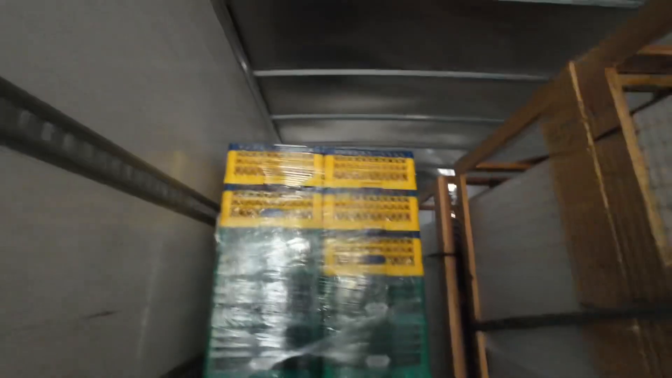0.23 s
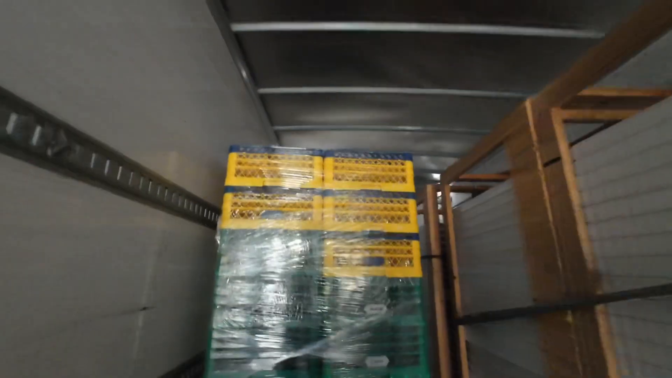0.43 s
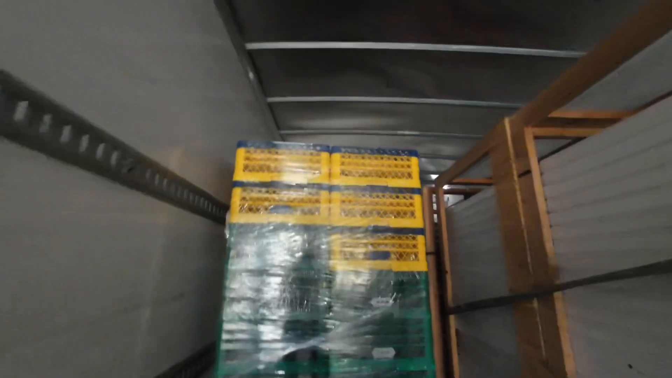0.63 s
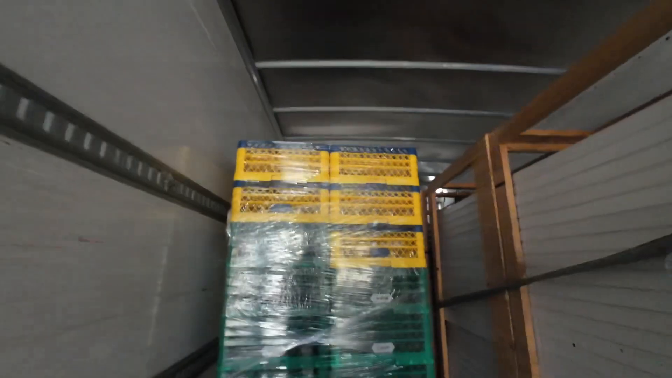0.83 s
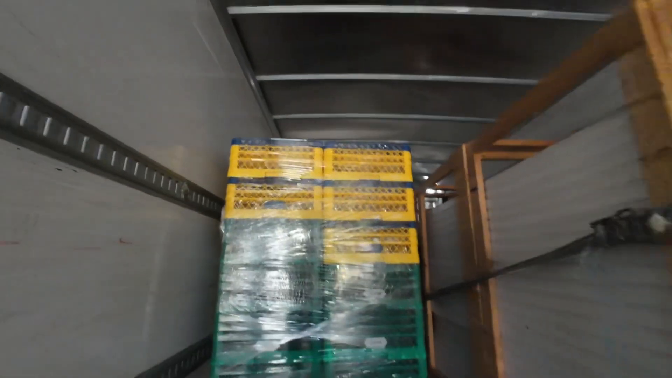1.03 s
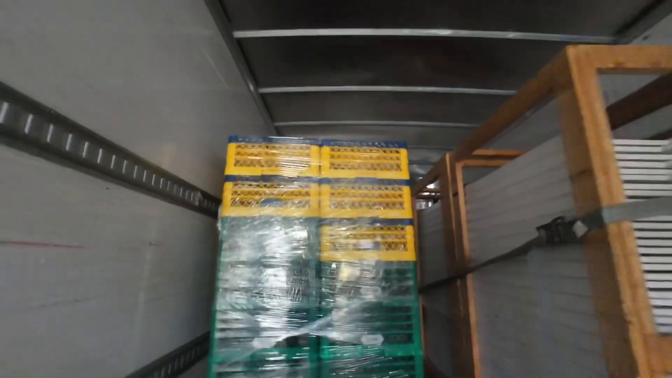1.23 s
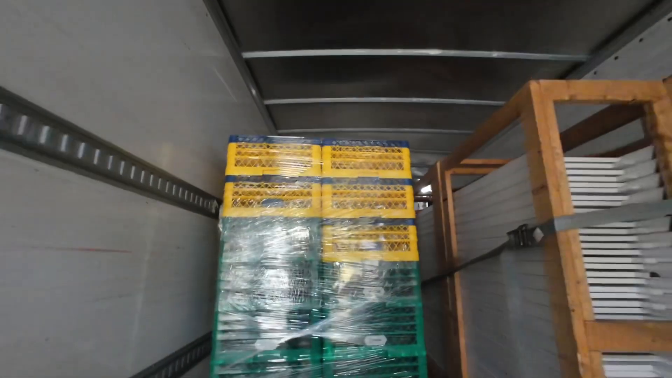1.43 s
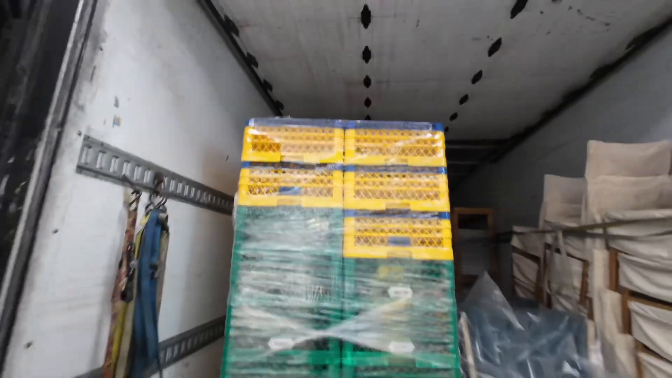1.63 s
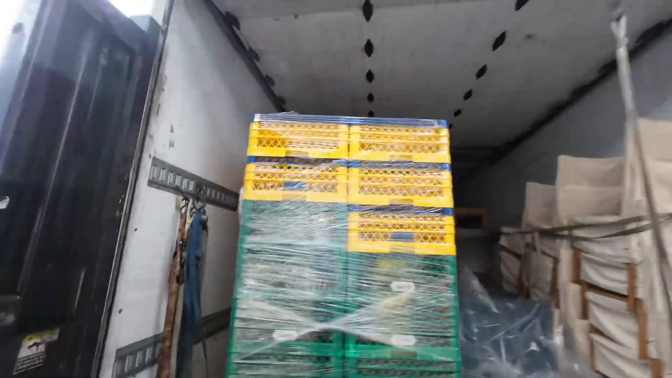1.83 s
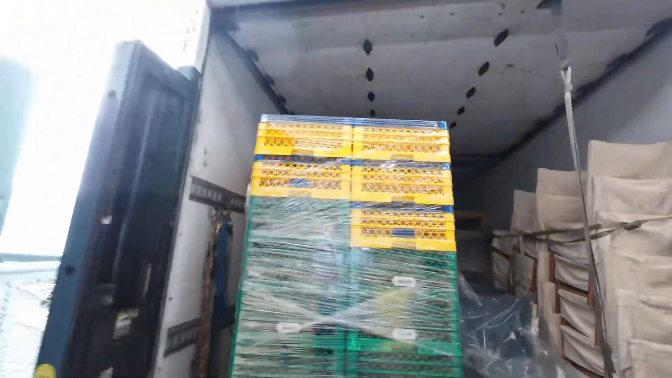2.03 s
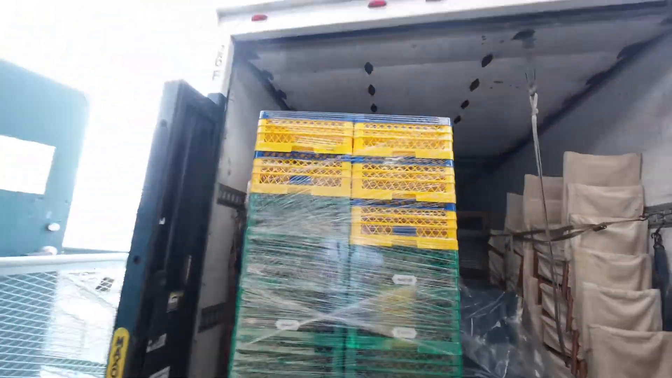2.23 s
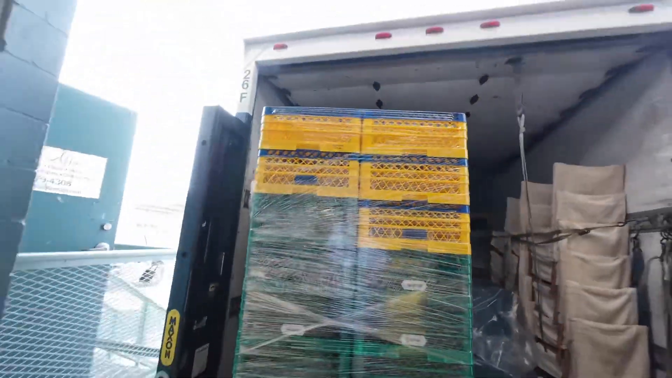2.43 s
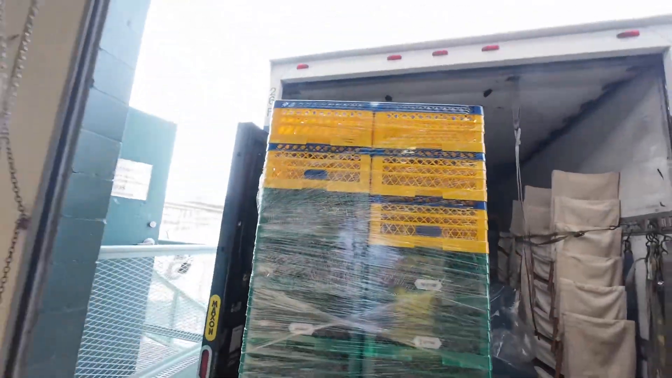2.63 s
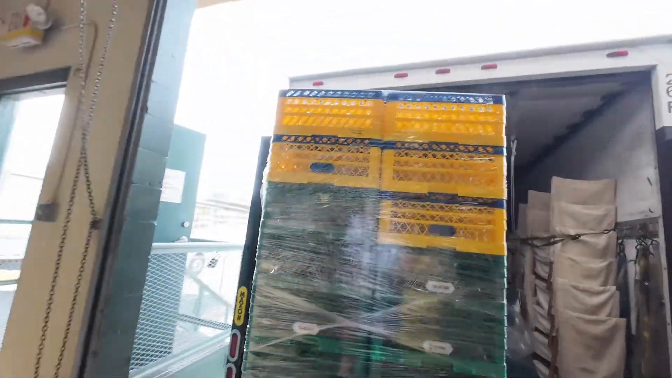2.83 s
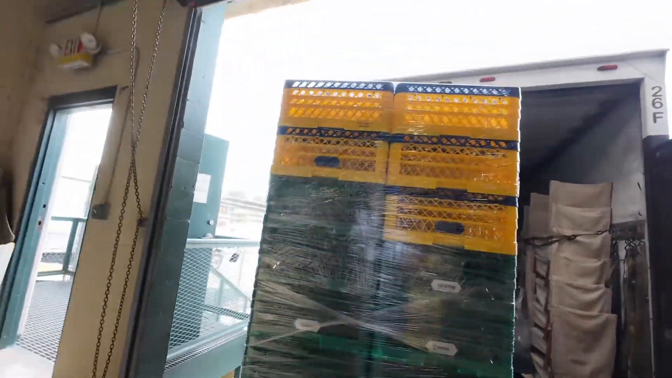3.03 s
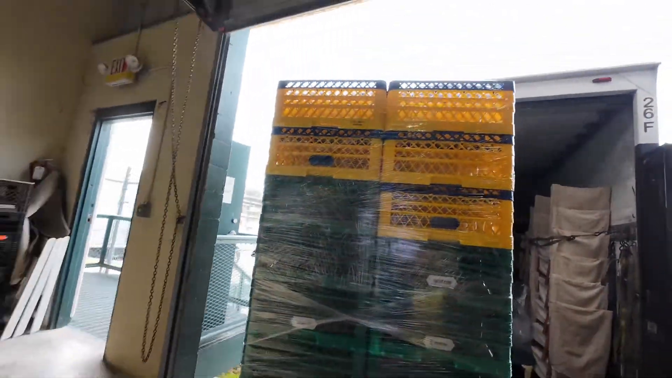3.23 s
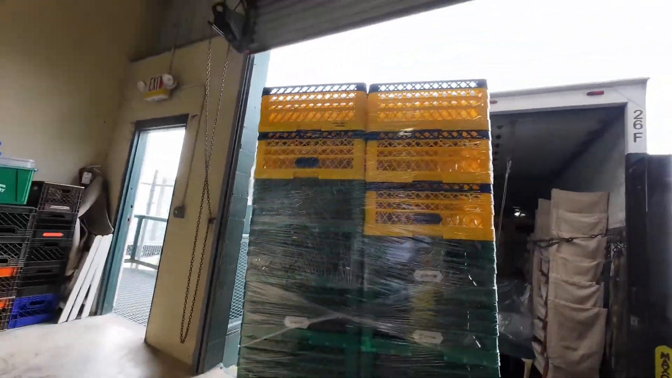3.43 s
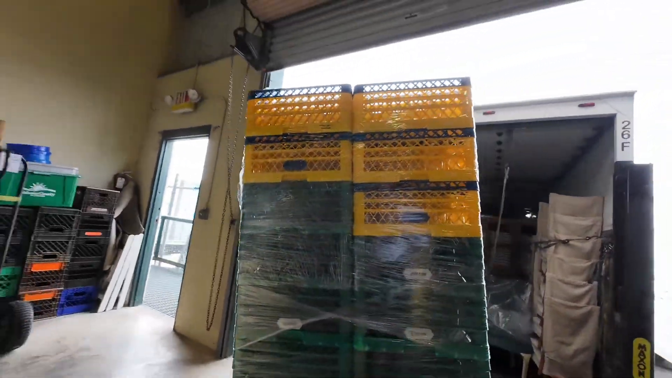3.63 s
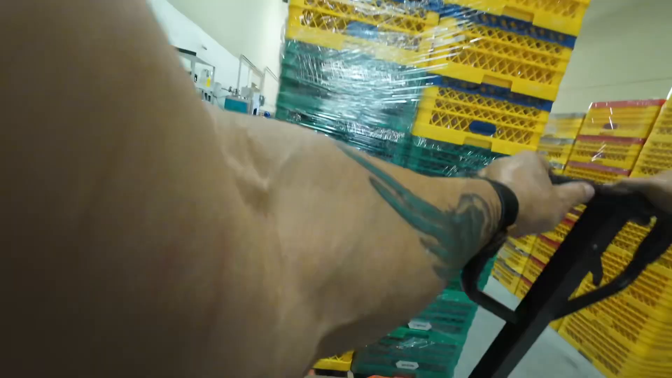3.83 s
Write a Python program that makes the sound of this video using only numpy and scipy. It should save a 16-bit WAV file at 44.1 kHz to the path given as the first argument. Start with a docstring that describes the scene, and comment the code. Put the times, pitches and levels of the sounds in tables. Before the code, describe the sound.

A hand pallet jack hauling wrapped crates starts from near silence, clanks and rattles in a truck, eases briefly, then booms and bangs across the dock plate indoors; close microphone, reverberant hard space.

```python
"""Loading dock: a hand pallet jack hauls wrapped plastic crates out of a truck, over a steel plate, indoors.
Random wheel contacts drive filters: the floor booms and drums, the pallet chatters, grit crunches.
Short contact flurries make clanks, knocks, thumps, scrapes and snaps, each with a diffuse noise tail.
Fine hiss is filtered contacts; small steel parts and one squeaking wheel are wavering sines."""
import sys
import numpy as np
from scipy import signal
from scipy.fft import rfft, irfft, next_fast_len
from scipy.io import wavfile
from scipy.ndimage import map_coordinates

SR = 44100
rng = np.random.default_rng(int(sys.argv[2]) if len(sys.argv) > 2 else 0)


def unload_wav(signal):
    """Save mono or channel-first audio to the path in sys.argv[1] as 16-bit WAV at rate SR, clipped to [-1, 1]."""
    wavfile.write(
        sys.argv[1],
        SR,
        np.round(np.clip(np.atleast_2d(signal).T, -1, 1) * 32767).astype(np.int16),
    )


N = 171990
T = np.arange(SR) / SR  # one second, for single events
CLOCK = np.arange(N) / SR

# spectra of the hollow floor, the pallet and finely hissing surfaces: f/Hz, relative level/dB
FLOOR_COLOUR = [(50, -30.5), (95, -8), (125, -0.5), (158, -3.5), (197, 1.5), (240, -1.5), (310, -2),
                (420, -8), (900, -41), (3000, -95)]
WOOD_COLOUR = [(120, -32), (280, -8), (400, 2), (520, 1.5), (680, -2.5), (900, -8.5), (1300, -16),
               (2500, -41), (8000, -68)]
HISS_COLOUR = [(2500, -22), (5500, -3.5), (7800, -1), (9000, -1), (9700, 0), (10600, -0.5), (11800, -2.5),
               (13500, 5.5), (15000, -6.5), (16000, -17.5)]


def amp(db):
    """Decibels to gain."""
    return 10 ** (np.asarray(db) / 20)


def unit(x):
    """Scale to rms 1."""
    return x / np.sqrt(np.mean(x ** 2) + 1e-20)


def along(points, hz):
    """Interpolate (f/Hz, value) points on a log frequency axis."""
    f, v = np.transpose(points)
    return np.interp(np.log(hz + 1), np.log(f + 1), v)


def curve(rows):
    """Interpolate a (t/s, value) table to one value per sample."""
    return np.interp(CLOCK, *np.transpose(rows))


def wobble(rate, size=N):
    """Smooth random curve with `rate` knots a second."""
    knots = rng.standard_normal(4096)
    return map_coordinates(knots, [np.arange(size) * rate / SR], mode="wrap")


def fade(t60):
    """Exponential decay of 60 dB in t60 seconds."""
    return np.exp(-np.log(1000) * T / max(t60, 1e-3))


def body(colour, focus_hz=1000, focus_db=0, size=16384):
    """Minimum-phase impulse response of energy 1 with this colour and one resonance lifted."""
    hz = np.fft.rfftfreq(size, 1 / SR)
    lift = focus_db / (1 + (np.log((hz + 1) / focus_hz) / .11) ** 2)
    cepstrum = irfft(np.log(amp(along(colour, hz) + lift)))
    # fold the cepstrum to make the response causal
    cepstrum[1:size // 2] *= 2
    cepstrum[size // 2 + 1:] = 0
    h = irfft(np.exp(rfft(cepstrum)))
    return h / np.linalg.norm(h)


def contacts(rate, spread_db, size):
    """Random tiny impacts, `rate` a second on average, of uneven size; rms 1."""
    hits = rng.random(size) < rate / SR
    force = rng.standard_normal(size)
    spread = amp(spread_db * np.clip(rng.standard_normal(size), -2, 2))
    return unit(hits * force * spread)


def room(x, wet_db):
    """Add a fresh diffuse noise tail; each frequency dies at its own speed."""
    # reverberation: f/Hz, t60/s
    decay = [(100, 0.25), (500, 1.2), (1500, 0.86), (4000, 0.82), (9000, 0.61), (15000, 0.63)]
    hz, t, z = signal.stft(rng.standard_normal(SR), SR, nperseg=256)
    z = z * np.exp(-np.log(1000) * t / along(decay, hz)[:, None])
    tail = signal.istft(z, SR, nperseg=256)[1][:SR]
    tail = tail * (1 - np.exp(-T / 0.004))  # gradual onset
    wet = signal.fftconvolve(x, tail / np.linalg.norm(tail))[:len(x)]
    return x + amp(wet_db) * wet


def blow(response, length, rate, rise, clump_db=0):
    """A swelling, then dying flurry of contacts strikes a body; rms 1 over the first 20 ms."""
    envelope = fade(length) * (1 - np.exp(-T / rise))
    force = contacts(rate, 0.59, SR) * envelope * amp(clump_db * wobble(109, size=SR))
    x = signal.fftconvolve(force, response)[:SR]
    return x / np.sqrt(np.mean(x[:SR // 50] ** 2) + 1e-20)


def add(out, s, x):
    """Mix an event in at time s; its ringing stops short at the next break."""
    # instants where the ringing of earlier events is cut: t/s
    breaks_s = [.182, 1.531]
    start = round(s * SR)
    end = min([N, start + len(x)] + [round(b * SR) for b in breaks_s if b > s])
    out[start:end] += x[:end - start]


def rolling(colour, rate, spread_db):
    """Surface roughness shakes a body without pause; rms 1."""
    return unit(signal.fftconvolve(contacts(rate, spread_db, N), body(colour))[:N])


def wheels():
    """Wheels make the floor flex, boom and drum, bounce the pallet on the forks and crush grit."""
    # slow flexing of the truck bed: t/s, level/dB
    sub_db = [(0, -34), (.28, -38), (.37, -19.5), (.68, -21), (.79, -30.5), (1.48, -33), (1.54, -17),
              (1.78, -21), (1.88, -17), (2.15, -25), (2.3, -30), (2.6, -32), (3.05, -30), (3.45, -35),
              (3.65, -44), (3.9, -44)]
    # hollow floor, drumming, pallet chatter, grit: t/s, level/dB before trim
    boom_db = [(0, -48), (.18, -49), (.22, -31.5), (.32, -31), (.4, -21.5), (.62, -23), (.78, -29.5),
               (1.4, -31), (1.5, -26), (1.54, -17.5), (1.75, -20), (1.88, -16), (2.1, -18.5), (2.3, -29),
               (2.45, -17.5), (2.65, -27), (3.05, -22.5), (3.45, -31), (3.7, -47), (3.9, -54)]
    drum_db = [(0.0, -56), (0.25, -23), (0.65, -22), (0.79, -26), (1.66, -19.5), (1.67, -18), (1.8, -21),
               (1.83, -18), (2.06, -19), (2.54, -16.5), (2.68, -21.5), (2.73, -18.5), (3.55, -24),
               (3.76, -39.5), (3.88, -38), (3.9, -54)]
    chatter_db = [(0.0, -52.5), (0.17, -40), (0.34, -24), (0.43, -24), (0.53, -22.5), (0.69, -45),
                  (1.1, -30), (1.29, -29), (1.77, -30.5), (2.0, -25.5), (2.36, -28.5), (2.43, -20),
                  (2.75, -27), (2.92, -20), (3.17, -25), (3.43, -23.5), (3.76, -39), (3.9, -46)]
    grit_db = [(0, -42.5), (.24, -46.5), (.33, -18), (.5, -19), (.85, -41.5), (1.0, -37), (1.3, -25.5),
               (1.55, -37), (1.68, -42), (1.88, -33.5), (2.04, -24.5), (2.3, -27.5), (2.7, -28.5),
               (3.05, -20), (3.28, -33), (3.5, -17), (3.72, -37.5), (3.9, -41)]
    # spectra: f/Hz, relative level/dB
    sub_colour = [(10, -15.5), (26, 2.5), (45, 2.5), (58, 1.5), (90, -39), (300, -85)]
    boom_colour = [(30, -29.5), (55, -4), (70, -1), (85, 2.5), (108, -11), (170, -26.5), (500, -85)]
    grit_colour = [(300, -21), (900, 5), (1500, 1), (2800, -1.5), (4500, -8), (7000, -21), (10000, -21.5),
                   (11700, -44), (13600, -37), (16000, -35)]
    bounce_hz, bounce_depth_db = 32, 3  # mean rate; swing each way

    sub = rolling(sub_colour, rate=1400, spread_db=2.5) * amp(curve(sub_db))
    boom = rolling(boom_colour, rate=900, spread_db=4.5) * amp(curve(boom_db) - 1.5)
    drum = rolling(FLOOR_COLOUR, rate=2500, spread_db=0.5) * amp(curve(drum_db) - 2.5)

    rate_hz = bounce_hz * (1 + 0.2003 * wobble(17))
    bounce = np.cos(2 * np.pi * np.cumsum(rate_hz) / SR)
    chatter = rolling(WOOD_COLOUR, rate=4000, spread_db=0.5) * amp(bounce_depth_db * bounce)
    chatter = unit(room(chatter, wet_db=-5.5)) * amp(curve(chatter_db) - 0.5)

    flicker_db = 0.55 * bounce + 0.73 * wobble(24.23)
    grit = rolling(grit_colour, rate=1800, spread_db=-0.5) * amp(flicker_db)
    grit = unit(room(grit, wet_db=0.5)) * amp(curve(grit_db) - 5.5)
    return sub + boom + drum + chatter + grit


def hiss():
    """Wheels and shrink wrap rustle: dense tiny contacts through a bright filter."""
    # mean course: t/s, level/dB
    hiss_db = [(0, -69), (.25, -57.5), (.6, -37.5), (.9, -49.5), (1.5, -50), (1.54, -60), (1.9, -52.5),
               (2.2, -47.5), (3.3, -52.5), (3.6, -58), (3.87, -38), (3.9, -70)]
    rustle = rolling(HISS_COLOUR, rate=9000, spread_db=2)
    return rustle * amp(curve(hiss_db) + wobble(28.8))


def clanks():
    """The loose steel frame clangs in its modes while its linkage jangles."""
    # frame modes: f/Hz, mean relative level/dB, t60/s
    frame_modes = [(1303, 2, .3), (1614, -3, 0.32), (1682, -9.5, 0.11), (1828, -6, 0.4), (2250, -7, .3),
                   (2454, -11, 0.14), (2670, 1, 0.45), (2792, 6, 0.18), (3045, 9.5, 0.1), (3070, -26, 0.1),
                   (3310, -30, 0.21), (4010, -10, 0.21), (7600, -3, 0.33), (11900, -16, 0.3)]
    # blows: t/s, clang/dB before trim, jangle/dB before trim, t60 of the contacts/s, lifted resonance/Hz
    clank_rows = [(0.072, -50, -75, .12, 1870), (0.155, -30.5, -41, 0.12, 1270),
                  (.27, -31, -40, 0.12, 2050), (.283, -16.5, -31, .11, 2740), (.296, -20, -44, 0.098, 3670),
                  (.341, -18, -41, 0.1, 3040), (.449, -22, -34, 0.15, 2150), (.468, -28, -38, 0.13, 4200),
                  (.578, -27, -53, 0.046, 1700), (0.694, -36, -37.5, 0.43, 3270),
                  (1.062, -40.5, -41.5, 0.19, 2970), (1.119, -33, -61, 0.18, 2700),
                  (1.148, -34, -62, 0.091, 2200), (1.244, -25.5, -34.5, 0.22, 2640),
                  (1.311, -28, -32.5, 0.29, 3500), (1.345, -36, -32, 0.23, 5400),
                  (1.402, -35, -46, 0.096, 1100), (1.751, -38, -49, 0.087, 2400),
                  (1.827, -38, -37.5, 0.08, 3070), (1.913, -19.5, -38, .17, 1280),
                  (1.929, -24, -41, 0.09, 1890), (1.984, -33, -32.5, 0.18, 1680),
                  (2.063, -25.5, -33.5, 0.32, 1940), (2.135, -28, -33, 0.17, 1560),
                  (2.423, -24.5, -32.5, 0.36, 1500), (2.495, -25, -36, 0.27, 2180),
                  (2.545, -28.5, -39, 0.059, 1640), (2.818, -16.5, -35, 0.13, 2280),
                  (2.869, -27.5, -33, 0.19, 1570), (2.935, -29, -39, 0.24, 2250),
                  (2.975, -27, -36.5, 0.083, 1920), (3.333, -36, -72, 0.28, 2600),
                  (3.371, -24.5, -39.5, 0.094, 1780), (3.425, -22, -27.5, 0.18, 4800),
                  (3.513, -25, -41, 0.11, 1490), (3.527, -25, -37, 0.072, 1360),
                  (3.659, -61, -33, 0.2, 5000), (3.716, -33.5, -50, 0.04, 2290)]
    # spectra: f/Hz, relative level/dB
    steel_colour = [(150, 5), (450, -16), (800, 2.5), (1100, -2), (1600, 0.5), (2700, -3.5), (3900, -3.5),
                    (5200, -19), (7500, -22), (16000, -35)]
    jangle_colour = [(1500, -47), (3500, -2.5), (5200, 4), (7000, -5.5), (10000, -8), (11700, -21),
                     (13600, -15.5), (16000, -45)]
    focus_db = 7.5  # lift of that resonance

    out, linkage = np.zeros(N), body(jangle_colour)
    modes = np.array([amp(db) * np.sin(2 * np.pi * hz * T) * fade(t60) for hz, db, t60 in frame_modes])
    for s, clang_db, jangle_db, length, hz in clank_rows:
        # each blow excites the modes differently
        ring = amp(rng.normal(0, 3, len(frame_modes))) @ modes
        steel = body(steel_colour, hz, focus_db)
        frame = np.pad(steel, (0, SR - len(steel))) + amp(-15.5) * ring / np.linalg.norm(ring)
        clang = amp(clang_db + 1) * blow(frame, length, rate=4000, rise=0.0057, clump_db=2.0)
        jangle = amp(jangle_db + 1.5) * blow(linkage, length, rate=4000, rise=0.0018)
        add(out, s, room(clang + jangle, wet_db=-4.5))
    return out


def thumps():
    """Wheels drop on the hollow floor and dock plate: short flurries into a body with one lifted resonance."""
    # t/s, level/dB before trim, lifted resonance/Hz
    thump_rows = [(.128, -34.5, 263), (.195, -26, 278), (1.53, -21, 180), (1.674, -14.5, 197),
                  (1.829, -16, 200), (1.855, -15, 155), (2.287, -24, 254), (2.431, -18, 107),
                  (2.717, -16, 218), (2.772, -15, 193), (2.919, -22.5, 118), (3.03, -19.5, 125),
                  (3.118, -17.5, 129), (3.29, -31, 118)]
    focus_db = 13.5  # lift of that resonance
    out = np.zeros(N)
    for s, db, hz in thump_rows:
        thump = blow(body(FLOOR_COLOUR, hz, focus_db), 0.11, rate=1000, rise=0.0023)
        add(out, s, room(amp(db - 0.5) * thump, wet_db=-5))
    return out


def knocks():
    """The pallet slams on the forks: one solid push plus a short flurry of contacts."""
    # t/s, flurry level/dB before trim, lifted resonance/Hz
    knock_rows = [(.13, -24.5, 685), (.253, -26, 573), (.335, -24, 756), (.39, -20.5, 770),
                  (0.464, -20, 820), (.584, -19, 765), (.673, -25, 600), (1.147, -19.5, 530),
                  (1.301, -14.5, 613), (1.311, -14.5, 630), (1.335, -17.5, 650), (1.404, -18.5, 607),
                  (1.584, -34, 400), (1.803, -33, 450), (1.83, -19.5, 605), (1.92, -15.5, 553),
                  (2.145, -20, 337), (2.285, -14.5, 520), (2.329, -18, 292), (2.397, -17, 470),
                  (2.455, -18.5, 454), (2.499, -23, 360), (2.55, -20, 516), (2.714, -15.5, 597),
                  (2.755, -18.5, 630), (2.818, -16.5, 366), (2.97, -30, 466), (3.241, -19.5, 500),
                  (3.262, -20, 490), (3.376, -17.5, 555), (3.402, -15, 450), (3.45, -20, 425),
                  (3.512, -21.5, 517), (3.528, -21.5, 930)]
    focus_db = 4.5  # lift of that resonance
    out = np.zeros(N)
    for s, db, hz in knock_rows:
        pallet = body(WOOD_COLOUR, hz, focus_db)
        push = np.pad(pallet, (0, SR - len(pallet))) * np.sqrt(SR / 50)  # energy of rms 1 over 20 ms
        flurry = blow(pallet, 0.09, rate=3000, rise=0.0015)
        add(out, s, room(amp(db - 2.5) * (flurry + amp(-5.5) * push), wet_db=-5))
    return out


def scrapes():
    """Steel scrapes with a bright hiss: dense contacts dying over a set length."""
    # t/s, level/dB, t60 of the contacts/s
    scrape_rows = [(0.283, -35, 0.32), (.54, -60, 0.44), (.7, -56, 1), (1.038, -35.5, .3),
                   (1.066, -35.5, 0.24), (1.255, -29, 0.22), (1.304, -26.5, 0.75), (1.348, -34, 0.25),
                   (1.412, -43, .3), (2.084, -44, 0.45), (2.853, -33, 0.3), (3.427, -36, 0.41)]
    out, sizzle = np.zeros(N), body(HISS_COLOUR)
    for s, db, length in scrape_rows:
        scrape = amp(db) * blow(sizzle, length, rate=5000, rise=0.0023)
        add(out, s, room(scrape, wet_db=-10))
    return out


def snaps():
    """Crates snap against each other: very short, abrupt flurries through a bright filter."""
    # t/s, level/dB before trim
    snap_rows = [(0.297, -24.5), (0.345, -28), (0.456, -29.5), (0.543, -35), (0.584, -31.5), (0.926, -46),
                 (1.065, -42), (2.063, -29), (2.423, -29), (2.468, -46), (2.715, -44), (3.376, -29.5),
                 (3.598, -37.5)]
    out, sizzle = np.zeros(N), body(HISS_COLOUR)
    for s, db in snap_rows:
        snap = amp(db - 5) * blow(sizzle, 0.048, rate=6000, rise=0.00044)
        add(out, s, room(snap, wet_db=-2))
    return out


def pings():
    """Small steel parts ring: one high decaying sine each, roughened by random pitch wobble."""
    # t/s, mean f/Hz, level/dB before trim, t60/s
    ping_rows = [(.345, 11800, -44, 0.27), (.425, 12400, -44, .2), (.462, 12400, -43, .2),
                 (.462, 11650, -44, 0.2), (1.255, 11700, -54, 0.22), (1.33, 9720, -34, 0.27),
                 (1.365, 9650, -32.5, 0.2), (2.429, 5640, -35, 0.12), (2.503, 5480, -37, 0.098)]
    out = np.zeros(N)
    for s, hz, db, t60 in ping_rows:
        phase = 2 * np.pi * np.cumsum(hz + 60 * wobble(500, size=SR)) / SR
        envelope = fade(t60) * (1 - np.exp(-T / 0.0065))
        add(out, s, amp(db + 11.5) * np.sin(phase) * envelope)
    return out


def squeak():
    """A wheel bearing gives one thin, mostly falling squeak: a sine with wavering pitch."""
    # t/s, mean f/Hz, rms level/dB
    squeak_rows = [(1.605, 10100, -65), (1.632, 9900, -40), (1.652, 9790, -33), (1.674, 9700, -52.5),
                   (1.76, 9770, -61)]
    s, hz, db = np.transpose(squeak_rows)
    pitch_hz = np.interp(CLOCK, s, hz) + 25 * wobble(250)
    phase = 2 * np.pi * np.cumsum(pitch_hz) / SR
    level = amp(np.interp(CLOCK, s, db, left=-120, right=-120))
    return np.sqrt(2) * np.sin(phase) * level


def scene():
    """Sum of all sounds of the moving jack, one channel."""
    steady = wheels() + hiss()
    blows = clanks() + thumps() + knocks() + scrapes() + snaps()
    return (steady + blows + pings() + squeak())[None]


def record(dry):
    """The recorder rounds the highest peaks and keeps nothing above its band limit."""
    ceiling, top_hz = .75, 15800
    x = dry / (1 + np.abs(dry / ceiling) ** 6) ** (1 / 6)
    size = next_fast_len(N + SR // 2)
    passed = np.fft.rfftfreq(size, 1 / SR) < top_hz
    return irfft(rfft(x, size) * passed, size)[:, :N]


dry = scene()
out = record(dry)
unload_wav(out)
```